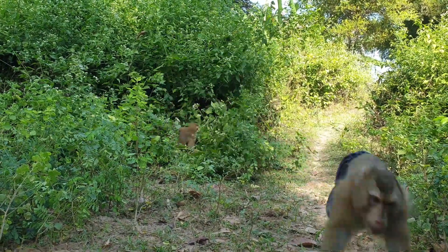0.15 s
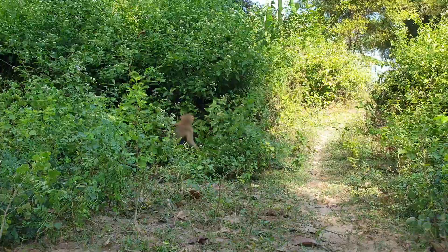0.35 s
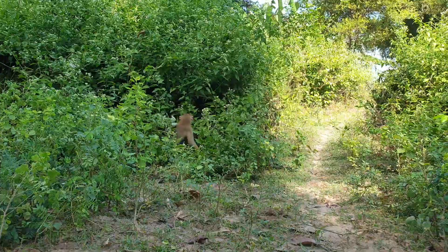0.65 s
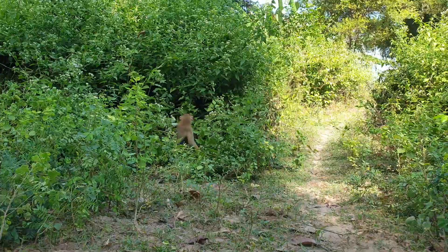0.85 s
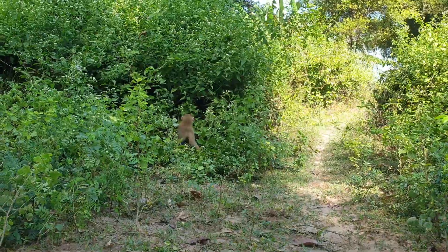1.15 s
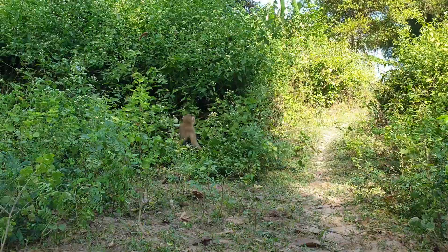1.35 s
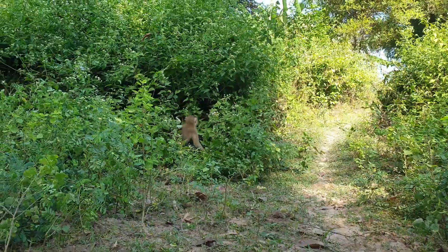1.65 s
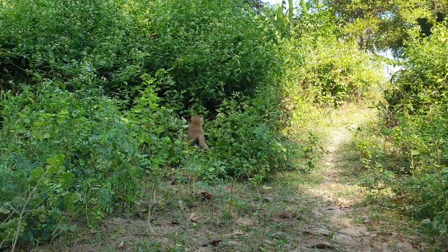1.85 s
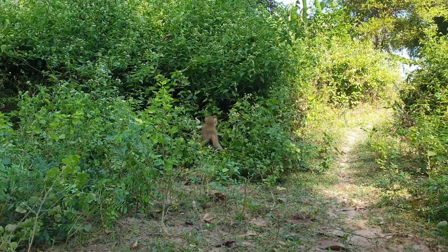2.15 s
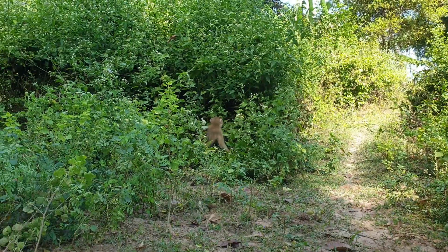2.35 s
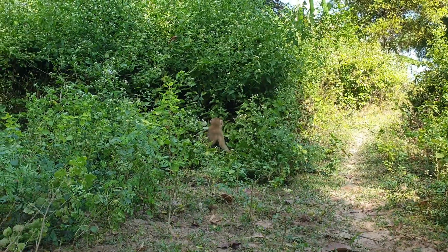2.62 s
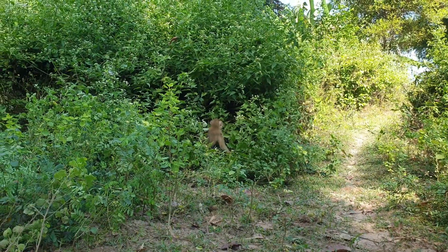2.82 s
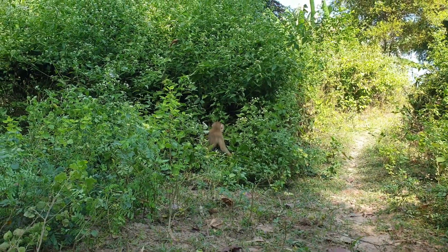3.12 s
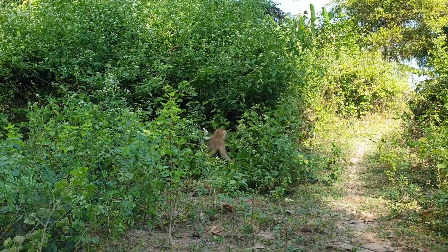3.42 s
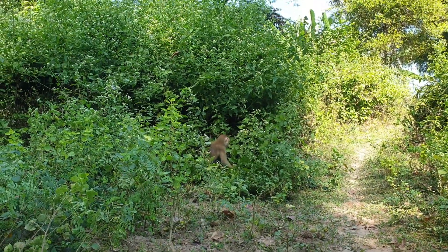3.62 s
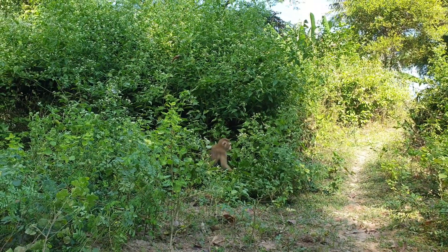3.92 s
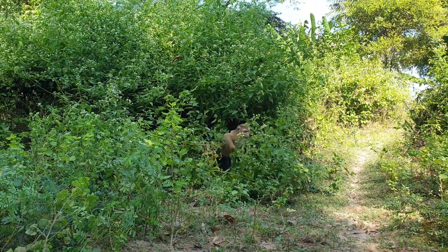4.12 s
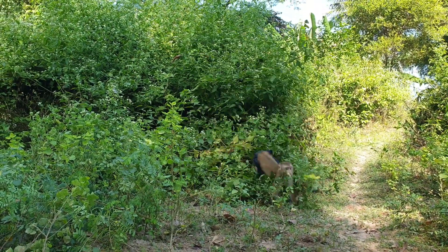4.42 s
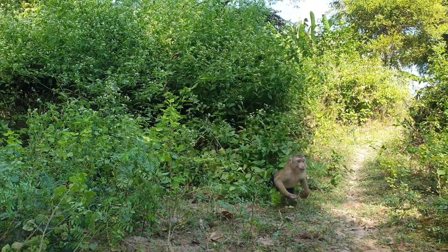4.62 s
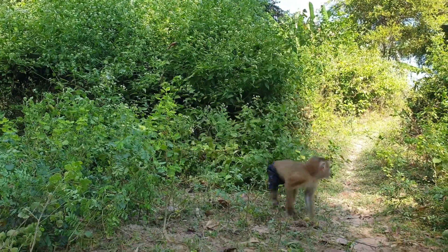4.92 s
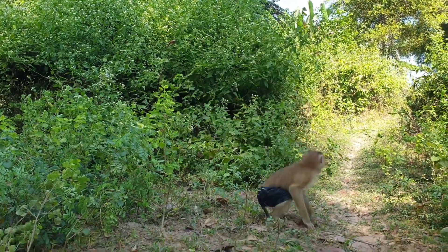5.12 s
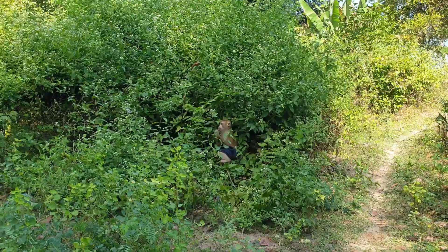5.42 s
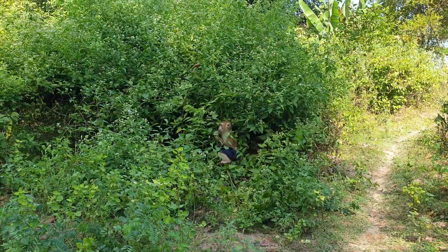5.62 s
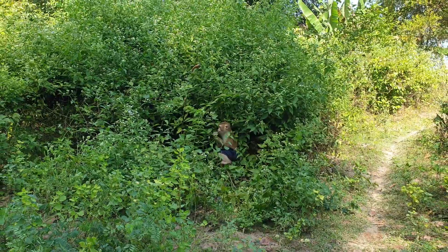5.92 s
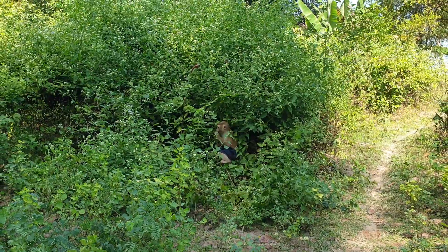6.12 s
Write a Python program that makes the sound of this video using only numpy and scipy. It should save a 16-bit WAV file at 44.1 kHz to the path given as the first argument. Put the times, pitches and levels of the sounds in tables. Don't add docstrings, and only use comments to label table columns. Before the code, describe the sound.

Outdoors, a monkey squeals briefly and crashes through leaves, rustles again later, while birds tonk and chip over rumble and fingers finally knock the microphone.

```python
import sys
import numpy as np
from scipy import signal
from scipy.fft import rfft, irfft, next_fast_len
from scipy.io import wavfile
from scipy.ndimage import uniform_filter1d

SR = 44100
rng = np.random.default_rng(int(sys.argv[2]) if len(sys.argv) > 2 else 0)


def waveform_to_disk(signal):
    frames = np.transpose(np.atleast_2d(signal))
    scaled = np.clip(frames, -1, 1) * 32767
    samples = np.round(scaled).astype(np.int16)
    wavfile.write(sys.argv[1], SR, samples)


def voltage_ratio(decibels):
    exponent = np.asarray(decibels, float) / 20
    return 10 ** exponent


N = 276507
TIME = np.arange(N) / SR

# f/Hz, density/dB
LEAF_COLOUR = [(1500, -16.5), (2200, -8), (3200, -5.5), (4500, -7), (6300, -8), (9500, -4), (11000, -4.5),
               (13000, -8), (15700, -11.5)]


def curve(rows):
    s, *columns = np.transpose(rows)
    sounding = (TIME >= s[0]) & (TIME <= s[-1])
    return [np.interp(TIME, s, c) for c in columns], sounding


def unit(x):
    return x / np.sqrt(np.mean(x ** 2))


def colour(x, points, lead=0.):
    size = next_fast_len(x.shape[-1])
    hz, db = np.transpose(points)
    log_hz = np.log(np.fft.rfftfreq(size, 1 / SR) + 1)
    gain = voltage_ratio(np.interp(log_hz, np.log(hz), db, left=-90, right=-90))
    return irfft(rfft(x, size) * gain * np.exp(1j * lead), size)[..., :x.shape[-1]]


def band(x, lo_hz, hi_hz, order=2):
    return signal.sosfilt(signal.butter(order, [lo_hz, hi_hz], "bandpass", fs=SR, output="sos"), x)


def walk(rate):
    k = int(SR / rate)
    held = np.repeat(rng.standard_normal(N // k + 1), k)
    return 1.19 * uniform_filter1d(uniform_filter1d(held, k), k)[:N]


def swells(rows, floor_db=-130):
    t = TIME[::32]
    power = voltage_ratio(2 * floor_db)
    for s, db, rise, fall in rows:
        below_peak = 10 * np.where(t < s, (s - t) / rise, (t - s) / fall)
        power = power + voltage_ratio(2 * (db - below_peak))
    return np.interp(TIME, t, 10 * np.log10(power))


def both_sides(rows):
    return [(*row, row[-1]) for row in rows]


def place(x, pan_db, lag=0):
    clock = TIME[:len(x)]
    late = np.interp(clock - np.round(lag) / SR, clock, x)
    return np.array([late * voltage_ratio(pan_db / 2), x * voltage_ratio(-pan_db / 2)])


def add(out, s, sound):
    i = int(s * SR)
    part = sound[..., max(-i, 0):N - i]
    out[..., max(i, 0):max(i, 0) + part.shape[-1]] += part


def echoes(x, t60, wet_db, pan_db=0., gap=0.0039):
    t = TIME[:SR]
    tail = rng.standard_normal((2, SR)) * voltage_ratio(-60 * t / t60) * (t > gap)
    tail = tail / np.sqrt(np.sum(tail ** 2, axis=1, keepdims=True))
    side_db = np.array([[pan_db], [-pan_db]]) / 2
    return signal.fftconvolve(x[None], tail, axes=1)[:, :N] * voltage_ratio(wet_db + side_db)


def tone(hz, db, on):
    soft = uniform_filter1d(1. * on, size=300, mode="nearest")
    return np.sqrt(2) * np.sin(2 * np.pi * np.cumsum(hz) / SR) * voltage_ratio(db) * soft


def edges(x):
    return unit(band(x, 9170, 17800, order=5))


def wood():
    # f/Hz, density/dB
    hiss_colour = [(180, -31), (300, -0.5), (411, -12.5), (663, -11), (744, -11), (836, -9.5),
                   (1220, -14.5), (1590, -16.5), (2180, -17.5), (4740, -23.5), (6170, -24), (8310, -30.5),
                   (11800, -19.5), (14800, -21), (15600, -19.5)]
    hiss = unit(colour(rng.standard_normal((2, N)), hiss_colour))
    return hiss * voltage_ratio(-74.7 + 0.58 * walk(2.03) + 0.94 * walk(19))


def rumble():
    # f/Hz, density/dB
    drone_colour = [(12, -64), (20, -36), (27, -20), (29, -26), (41, -14), (66, 0), (103, -9), (129, -14),
                    (165, -19.5), (242, -27), (301, -36), (412, -49), (520, -45.5), (680, -61.5),
                    (1140, -120)]
    # t/s, peak level/dB, slope either side/(s per 10
    # dB)
    surges = [(0.006, -49.8, 0.25), (0.262, -45.2, 0.034), (0.476, -47.3, 0.098), (0.61, -43.4, 0.055),
              (0.879, -44.2, 0.108), (1.097, -41.3, 0.065), (1.262, -43.1, 0.076), (1.458, -43.8, 0.061),
              (1.619, -42.8, 0.079), (1.834, -45.1, 0.147), (2.059, -47.0, 0.042), (2.222, -46.2, 0.032),
              (2.395, -45.8, 0.165), (2.68, -37, 0.055), (2.933, -49.1, 0.149), (3.099, -46.1, 0.106),
              (3.234, -43.4, 0.071), (3.511, -47.1, 0.164), (3.747, -48.1, 0.045), (3.904, -44.8, 0.099),
              (4.077, -46.3, 0.225), (4.267, -45.6, 0.031), (4.433, -43.9, 0.097), (4.63, -45.4, 0.111),
              (4.756, -46.1, 0.026), (4.928, -44.7, 0.113), (5.241, -45.9, 0.136), (5.536, -47.4, 0.174),
              (5.872, -40.3, 0.096), (6.096, -50.3, 0.123)]
    # t/s, peak level/dB, slope either side/(s per 10 dB)
    gust_rows = [
        (.26, -55, .05),
        (.52, -51, .1),
        (1.35, -61, .4),
        (2.69, -54, .05),
        (3.87, -52, .05),
        (4.14, -56, .1),
        (4.6, -59, .2),
        (5.87, -53, .06),
        (6.12, -53, .06),
    ]
    swell_db = swells(both_sides(surges), floor_db=-62)
    gust_db = swells(both_sides(gust_rows), floor_db=-68)
    shared, own = rng.standard_normal(N), rng.standard_normal((2, N))
    body = unit(np.array([colour(shared, drone_colour, lead=.55), colour(shared, drone_colour)]))
    body = unit(body / (uniform_filter1d(body[1] ** 2, size=2500) + 0.13) ** 0.27)
    local = .4 * unit(colour(own, drone_colour))
    machine = band(body + local, 30, 173)
    gusts = unit(band(body + 5.2 * local, 170, 580))
    return (machine * voltage_ratio(swell_db) + gusts * voltage_ratio(gust_db)) * voltage_ratio(np.array([[-2.2], [2.0]]))


def tonk_bird():
    # t/s, peak level/dB
    notes_struck = [(-.022, -54.5), (.421, -57.5), (.871, -57.5), (1.313, -58.5), (1.764, -57.5),
                    (2.211, -58.5), (2.66, -58), (3.111, -57.5), (3.557, -57.5), (4.0, -56.5), (4.449, -56),
                    (4.893, -58), (5.333, -58.5), (5.773, -57)]
    out = np.zeros(N)
    t = TIME[:int(.058 * SR)]
    swell = np.minimum(t / .009, 1) * (.3 + .7 * np.minimum(t / .036, 1))
    shape = swell * np.clip((t[-1] - t) / .016, 0, 1)
    for (s, db), jitter in zip(notes_struck, rng.standard_normal(len(notes_struck))):
        hz = (722 + 200 * t) * (1 + .003 * jitter)
        puff = voltage_ratio(-14) * (t / t[-1]) * unit(band(rng.standard_normal(len(t)), 520, 870))
        add(out, s - .004, voltage_ratio(db + 2.8) * shape * (np.sin(2 * np.pi * np.cumsum(hz) / SR) + puff))
    swayed = np.interp(TIME + .0004 * walk(60), TIME, out)
    return place(out, 3.0, -16) + echoes(swayed, t60=.33, wet_db=-14, gap=.02)


def chip_bird():
    # t/s, length/s, start f/Hz, end f/Hz, peak level/dB
    glides = [(1.145, 0.047, 6570, 5450, -68.5), (1.178, 0.096, 4380, 6460, -72),
              (1.746, 0.084, 4680, 6260, -77), (1.857, .03, 7180, 5600, -63.5),
              (2.023, 0.023, 7230, 5430, -60.5), (2.33, 0.026, 7450, 5470, -64.5),
              (2.5, 0.029, 7130, 5370, -63), (2.983, 0.027, 7300, 5670, -60),
              (3.314, 0.028, 7370, 5660, -62.5), (3.465, 0.05, 6250, 6850, -82),
              (3.5, .05, 6750, 6900, -82), (3.615, .06, 4600, 6080, -78), (3.771, .025, 7320, 6070, -64),
              (3.979, 0.041, 6730, 6090, -65), (4.818, 0.034, 7130, 5900, -61.5),
              (4.89, 0.097, 4710, 6650, -73), (5.346, 0.029, 7320, 6000, -64),
              (5.553, .07, 4770, 6330, -84), (5.892, .03, 7300, 5720, -60)]
    # f/Hz, level/dB
    port_colour = [(3500, -6), (5000, -4), (5700, -2), (6300, 0), (6900, -2), (7500, -5), (8300, -18)]
    out = np.zeros(N)
    wobble, flutter = 1 + .035 * walk(700), voltage_ratio(4 * walk(400))
    strokes = []
    for s, length, top_hz, end_hz, db in glides:
        if end_hz < top_hz:
            strokes.append((s - .014, .007, 5500, top_hz, db - 6.5))
            strokes.append((s - .009, .014, top_hz * .97, top_hz * .96, db - 9))
            strokes.append((s + length - .004, .012, end_hz, end_hz * .94, db - 16))
    for s, length, from_hz, to_hz, db in glides + strokes:
        share = np.linspace(0, 1, int(length * SR))
        at = slice(int(s * SR), int(s * SR) + len(share))
        hoarse = .8 if length < .045 else .2
        hz = (from_hz + (to_hz - from_hz) * share) * wobble[at] ** hoarse
        shape = np.sin(np.pi * share ** 1.11) ** .5 * flutter[at]
        add(out, s, voltage_ratio(db) * shape * np.sin(2 * np.pi * np.cumsum(hz) / SR))
    out = colour(out, port_colour)
    swayed = np.interp(TIME + .0015 * (wobble - 1), TIME, out)
    near = echoes(swayed, t60=0.2, wet_db=-4.5, pan_db=10.5, gap=0.00091)
    far = echoes(colour(swayed, port_colour), t60=0.5, wet_db=-8, pan_db=15.0, gap=0.0024)
    return place(out, 19.2) * voltage_ratio(-10) + near + far


def far_monkey():
    # t/s, peak level/dB, rise/(s per 10 dB), fall/(s per 10 dB)
    pushes = [
        (5.57, -70, .035, .05),
        (5.635, -71, .04, .04),
        (5.7, -77, .02, .02),
        (5.74, -72, .03, .03),
        (5.8, -78, .03, .04),
        (5.87, -77, .03, .03),
        (5.945, -78, .05, .03),
    ]
    start, end = 5.51, 6.0
    arch = np.sin(np.pi * np.clip((TIME - start) / (end - start), 0, 1))
    flutter, throb_db = .045 * walk(250) + .012 * walk(35), 4 * walk(60)
    hz = (1128 + 40 * arch) * (1 + flutter)
    voice = tone(hz, swells(pushes) + 7 + throb_db, (TIME > start) & (TIME < end))
    return place(voice, -1.6, 15.3) + echoes(voice, t60=0.9, wet_db=-10.5)


def scrapes():
    # t/s, length/s, f/Hz,
    # width/Hz, level/dB
    rubs = [(.29, 0.076, 2600, 500, -70.5), (0.495, 0.033, 2750, 700, -63.5), (0.703, 0.13, 2980, 450, -72),
            (.82, 0.14, 2980, 500, -75), (1.005, 0.11, 2450, 700, -80), (4.241, .4, 3290, 300, -70.5),
            (4.441, 0.047, 3465, 500, -68), (4.518, 0.11, 3350, 500, -67.5), (5.49, .08, 1750, 400, -82),
            (3.87, .09, 1700, 1600, -78), (6.09, .13, 2600, 1200, -80), (.26, .11, 900, 1100, -70),
            (.66, .13, 800, 1200, -74), (6.08, .16, 480, 400, -72), (4.47, .12, 450, 400, -74),
            (4.72, .3, 480, 400, -78), (.36, .25, 150, 80, -60), (2.33, .15, 160, 80, -65),
            (.33, .2, 1680, 250, -76), (5.55, .12, 750, 200, -82), (5.69, .1, 1850, 400, -82),
            (5.79, .1, 1700, 1000, -84), (5.972, 0.07, 1500, 1300, -74.5), (6.044, .085, 1350, 400, -72),
            (6.135, .125, 1300, 700, -74), (.06, .2, 480, 500, -71), (.46, .07, 750, 900, -66),
            (5.98, .09, 2800, 700, -81), (6.135, .08, 750, 900, -72), (.575, .085, 2800, 1600, -67)]
    bend_hz_per_s = 600
    out = np.zeros(N)
    for s, length, hz, width_hz, db in rubs:
        share = np.linspace(0, 1, int(length * SR))
        low_pass = signal.butter(2, width_hz / 2, fs=SR, output="sos")
        grip = signal.sosfilt(low_pass, rng.standard_normal((2, len(share))))
        gliding_hz = hz + bend_hz_per_s * length * (share - .5)
        turn = np.exp(2j * np.pi * np.cumsum(gliding_hz) / SR)
        friction = unit(grip[0] * turn.real + grip[1] * turn.imag)
        add(out, s, voltage_ratio(db) * np.sin(np.pi * share) ** 0.4 * friction)
    out = out * voltage_ratio(2.7 * walk(200))
    return place(out, -2.5, 3.13) + echoes(out, t60=0.23, wet_db=-10.5, gap=0.0017)


def crackle(rate, spread_db, tail):
    hits = (rng.random(N) < rate / SR) * voltage_ratio(spread_db * rng.exponential(size=N))
    puff = signal.lfilter([1], [1, -np.exp(-1 / (tail * SR))], hits ** 2)
    return unit(rng.standard_normal((2, N)) * np.sqrt(puff))


def leaves():
    # t/s, peak level/dB, rise/(s per 10 dB), fall/(s per 10 dB), share of large leaves/dB
    brushes = [(0.013, -47.5, 0.037, 0.05, -7.2), (0.043, -58.5, 0.008, 0.248, -3.7),
               (0.25, -59.1, 0.017, 0.039, -1.8), (0.345, -55.8, 0.054, 0.036, -11),
               (0.428, -52.1, 0.064, 0.132, -14), (0.507, -57.2, 0.045, 0.033, -2.1),
               (0.57, -48.9, 0.014, 0.051, -6.3), (0.624, -59.0, 0.018, 0.257, -15.7),
               (0.721, -56.5, 0.032, 0.091, -11.1), (0.85, -59.7, 0.078, 0.123, -10.2),
               (0.963, -63.1, 0.125, 0.064, -10.2), (1.076, -71.0, 0.075, 0.028, -11.0),
               (4.081, -63.8, 0.037, 0.383, -7.5), (4.288, -56.1, 0.094, 0.261, -5.3),
               (4.458, -59.2, 0.021, 0.027, -4.7), (4.502, -54.2, 0.075, 0.02, -10.3),
               (4.578, -50.1, 0.1, 0.101, -8.3), (4.746, -62.9, 0.032, 0.123, -13.8),
               (4.848, -67.6, 0.15, 0.049, -6.5), (4.964, -72.3, 0.025, 0.141, -3.5),
               (5.072, -72.2, 0.061, 0.078, -16), (5.976, -66.7, 0.003, 0.056, -7.1),
               (6.017, -65.3, 0.027, 0.095, -21.0), (6.05, -73.8, 0.1, 0.625, -10.6)]
    small, large = (colour(crackle(rate=1300, spread_db=2.5, tail=.0025), LEAF_COLOUR) for _ in range(2))
    whole = unit(band(small + large, 3940, 7460, order=4))
    sprays = unit(band(large, 1330, 4980))
    stems = unit(band(crackle(rate=270, spread_db=0.0, tail=0.01), 280, 1260))
    fine_db = swells([row[:4] for row in brushes])
    coarse_db = swells([(s, db + share_db, rise, fall) for s, db, rise, fall, share_db in brushes])
    coarse = whole * voltage_ratio(1.4 + np.array([[2.0], [-2.0]]))
    coarse = coarse + sprays * voltage_ratio(-2.2 + np.array([[-1.6], [1.6]])) + stems * voltage_ratio(-6)
    return edges(small) * voltage_ratio(fine_db) + coarse * voltage_ratio(coarse_db)


def ticks():
    # t/s, peak level/dB, f/Hz, left minus right/dB
    flicks = [(.013, -52, 3400, 0), (.032, -54, 3500, 0), (.427, -58, 1300, 2), (.441, -58, 1600, 0),
              (.445, -56, 4300, 0), (.481, -54, 2500, -5), (.502, -56, 3000, -5), (.507, -54, 2460, -5),
              (.512, -54, 3000, -5), (.517, -48, 5170, -4), (.520, -55, 3000, -4), (.542, -54, 5300, -1),
              (.545, -58, 950, -1), (.568, -50, 3400, -3), (.579, -54, 3700, -3), (.583, -54, 2300, -3),
              (.656, -60, 2900, -4), (.720, -60, 3000, -4), (.732, -59, 5200, -4), (.756, -59, 2940, -4),
              (.803, -62, 3080, -5), (.811, -63, 3100, -5), (.880, -59, 2900, -7), (.886, -59, 2950, -7),
              (.899, -62, 3000, -7), (.908, -62, 3150, -7), (.928, -64, 2800, -7), (.954, -64, 3200, -7),
              (1.009, -61, 2500, -9), (1.025, -64, 2600, -9), (1.031, -64, 2400, -9),
              (1.060, -62, 2480, -8), (1.079, -65, 2900, -8), (1.092, -66, 2700, -8),
              (1.100, -67, 2100, -8), (4.205, -55, 4980, 8), (.33, -56, 5900, 8), (.338, -57, 5900, 8),
              (.445, -52, 6600, 2), (.258, -54, 6200, 8), (4.276, -57, 3150, 5), (4.448, -53, 5900, 2),
              (4.451, -53, 3600, 2), (4.533, -52, 3280, 2), (4.548, -52, 3500, 2), (4.590, -53, 4700, 2),
              (4.732, -62, 2470, 0), (5.977, -58, 2800, 0), (5.984, -59, 1300, 1), (5.990, -60, 1700, 1),
              (5.999, -60, 1400, 1), (6.024, -61, 1250, 0), (6.061, -63, 1310, 0), (6.241, -65, 1350, 3)]
    out = np.zeros((2, N))
    t = TIME[:900]
    shape = np.minimum(t / .0006, 1) * np.exp(-t / .0022)
    for (s, db, hz, pan_db), grit in zip(flicks, rng.standard_normal((len(flicks), len(t)))):
        ring = np.sin(2 * np.pi * hz * t) + .4 * unit(band(grit, hz * .7, hz * 1.5))
        add(out, s, place(voltage_ratio(db + 2.5) * ring * shape, pan_db, 3))
    return out + echoes(out.mean(axis=0), t60=.12, wet_db=-7, gap=.0015)


def twigs():
    # t/s, peak level/dB, coarse part relative/dB, left minus right/dB
    snaps = [(0.0144, -56.5, -24, 11), (0.187, -52, -17, 19), (0.251, -46, -2, 14), (0.4145, -39, -57, 8),
             (0.4425, -35, -30, 4), (0.4804, -50, 1, -13), (0.5165, -43, -1, -10), (0.5726, -58, -13, -17),
             (0.6567, -46.5, -17, -15), (0.73, -41, -70, -11), (0.8525, -42, -43, -20),
             (0.9507, -45.5, -25, -9), (1.009, -56.5, -5, -3.5), (1.061, -53, -19, -4.5),
             (1.5963, -59.5, -12, -2), (3.8606, -64, 2, 2), (3.8655, -62, -2, 2), (4.2045, -50, -5, 15),
             (4.448, -38, -8, 10), (4.5715, -41.5, -32, 3), (4.6394, -39, -32, 5), (4.6844, -43, -30, -7),
             (4.7341, -49, -13, -2.5), (4.96, -60, -2, 0.0), (5.9782, -48, -14, 2), (6.0162, -53, -22, 16)]
    out = np.zeros((2, N))
    t = TIME[:2600]
    shape = np.exp(-t / .002) + .4 * np.exp(-t / .014)
    for s, db, coarse_db, pan_db in snaps:
        burst = colour(rng.standard_normal((2, len(t))), LEAF_COLOUR)
        mix = edges(burst) + voltage_ratio(coarse_db) * unit(band(burst, 1500, 8100, order=4))
        side_db = np.array([[pan_db], [-pan_db]]) / 2
        add(out, s, voltage_ratio(db - 11.0 + side_db) * mix * shape)
    return out


def thuds(hits, lag):
    out = np.zeros((2, N))
    t = TIME[:3000]
    for s, db, hz, cycles, pan_db in hits:
        grit = unit(band(rng.standard_normal(len(t)), hz * .5, hz * 1.9, order=4))
        ring = np.sin(2 * np.pi * hz * t) + 0.29 * grit
        contact = np.sin(np.pi / 2 * np.minimum(1.3 * hz * t, 1)) ** 2
        add(out, s, place(voltage_ratio(db + 5.0) * contact * ring * np.exp(-2.2 * t * hz / cycles), pan_db, lag))
    return out + echoes(out.mean(axis=0), t60=.18, wet_db=-13, gap=0.0063)


def fingers():
    # t/s, peak level/dB, f/Hz, ring/cycles, left minus right/dB
    knocks = [(2.396, -51, 190, 2.1, 2), (2.671, -48.5, 151, 2.4, -13), (3.859, -55.5, 710, 2.5, -15),
              (3.859, -54.5, 2300, 3, -8), (3.865, -52, 1750, 6, -7.5), (3.866, -56, 1050, 4.3, -9),
              (4.611, -45, 139, 2.3, -13), (5.852, -42, 467, 1.74, 9), (5.851, -57, 1800, 2, 5),
              (5.872, -46, 296, 1.9, 7), (5.977, -47.5, 700, 1.04, 4), (6.018, -39, 304, 2, 2),
              (6.106, -55, 1340, 11, 0), (6.113, -56, 1400, 6, 0), (6.126, -36.5, 1235, 3.9, -1),
              (6.126, -42.5, 460, 1.6, 2), (6.153, -48, 636, 1.7, 5), (6.152, -51, 2050, 3, 0),
              (6.126, -58, 2500, 3, 0), (6.116, -62, 3100, 4, 0), (6.153, -56, 1200, 3, 0),
              (6.198, -52, 700, 1.4, 5)]
    return thuds(knocks, lag=9)


def feet():
    # t/s, peak level/dB, f/Hz, ring/cycles
    landings = [
        (0.046, -48, 337, 1.45),
        (.250, -46, 800, 1.5),
        (0.289, -52, 450, 1.5),
        (0.479, -51, 850, 4.0),
        (0.571, -45.5, 360, 2.7),
        (.572, -48, 800, 3),
        (0.707, -58, 1300, 1.6),
        (4.59, -49, 590, 2),
    ]
    return thuds([(*row, -1.5) for row in landings], lag=-4)


def monkey():
    # t/s, pitch f/Hz, level/dB, mouth opening as lift of the fourth harmonic/dB
    folds = [
        (.02, 428, -82, 20),
        (.04, 434, -67.5, 13.5),
        (.09, 432, -65.5, 17),
        (.17, 425, -70, 15),
        (.19, 435, -64, 4),
        (.212, 428, -66, 19),
        (.235, 412, -70, 15),
        (.25, 402, -74, 19),
        (.265, 402, -97, 20),
    ]
    # multiple of the pitch, level/dB
    harmonics = [
        (2, -5.5),
        (3, 1.5),
        (5, -13),
    ]
    # t/s, peak level/dB, rise/(s per 10 dB), fall/(s per 10 dB)
    pushes = [
        (0, -37.5, .01, .012),
        (.04, -56, .02, .1),
        (.165, -51, .03, .025),
        (.236, -44.5, .022, .02),
    ]
    (pitch, db, throat_db), on = curve(folds)
    pitch = pitch * (1 + .005 * walk(90) + .005 * walk(300))
    coo = sum(tone(k * pitch, db + rel_db + 2 * walk(45), on) for k, rel_db in harmonics)
    coo = coo + tone(4 * pitch, db + throat_db + 1.5 * walk(117.5), on)
    breath = unit(band(rng.standard_normal(N), 1530, 1800)) * voltage_ratio(db + 2.5) * on
    breath = breath + unit(band(rng.standard_normal(N), 1250, 2350)) * voltage_ratio(db - 5 + 3 * walk(60)) * on
    squeal_hz = (1678 - 40 * TIME) * (1 + .004 * walk(70) + .008 * walk(300))
    squeal = tone(squeal_hz, swells(pushes) + 0.88 * walk(87), TIME < .29)
    voice = coo + breath + squeal
    swayed = np.interp(TIME + .00012 * walk(150), TIME, voice)
    return place(voice, 1.0, -0.7) + echoes(swayed, t60=0.65, wet_db=-6.5)


def scene():
    background = wood() + rumble() + tonk_bird() + chip_bird() + far_monkey()
    scramble = scrapes() + leaves() + ticks() + twigs() + feet()
    return background + scramble + fingers() + monkey()


def top_cut(x):
    return signal.sosfilt(signal.butter(12, 15790, fs=SR, output="sos"), x)


def record(dry):
    mix = signal.sosfilt(signal.ellip(8, .2, 60, 15750, fs=SR, output="sos"), dry)
    return top_cut(mix)


dry = scene()
out = record(dry)
waveform_to_disk(out)
```